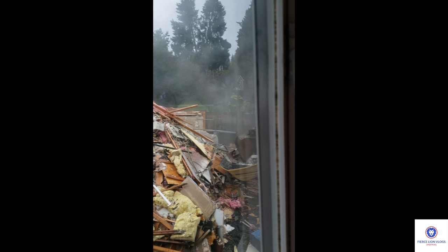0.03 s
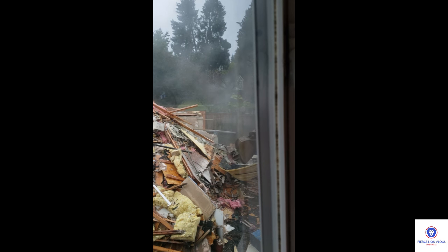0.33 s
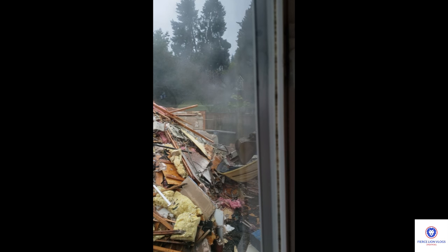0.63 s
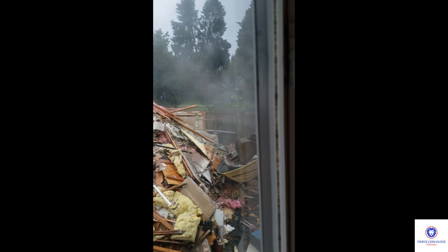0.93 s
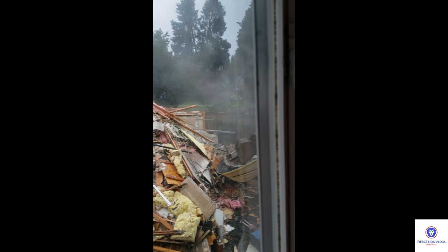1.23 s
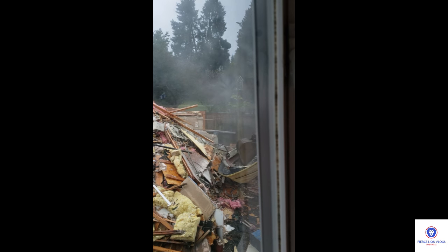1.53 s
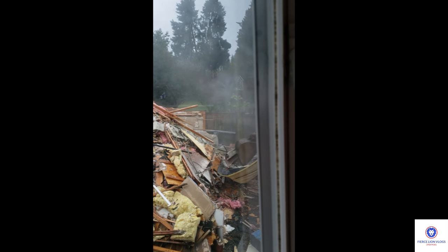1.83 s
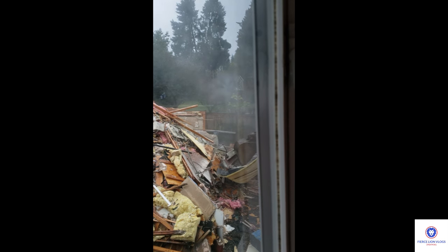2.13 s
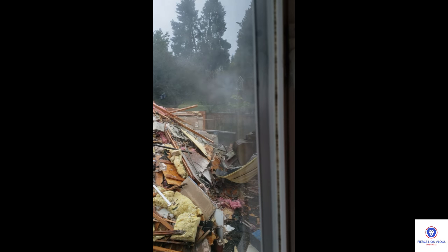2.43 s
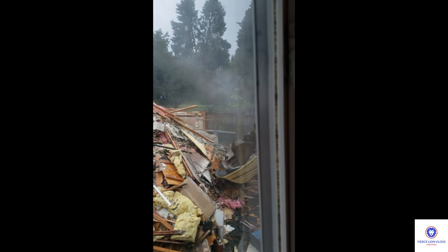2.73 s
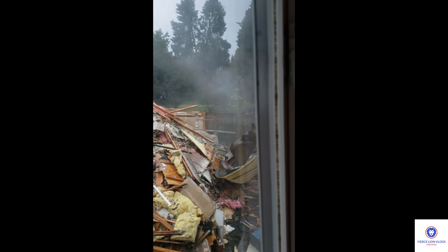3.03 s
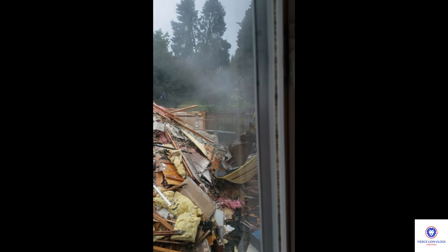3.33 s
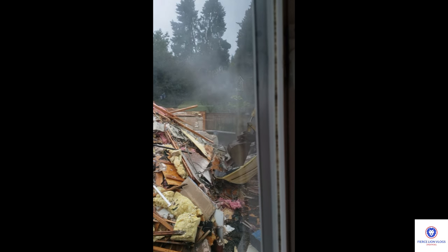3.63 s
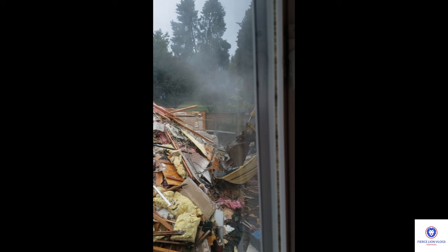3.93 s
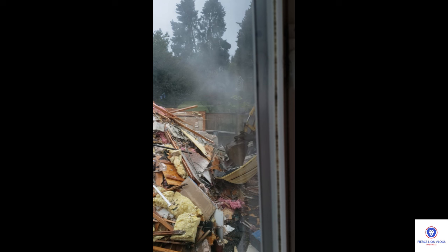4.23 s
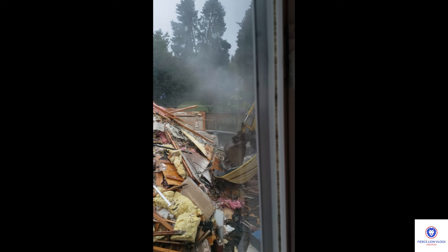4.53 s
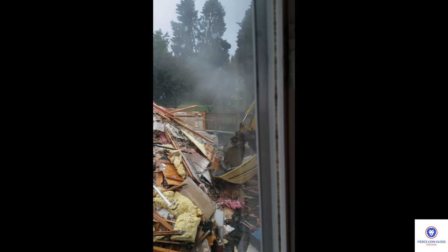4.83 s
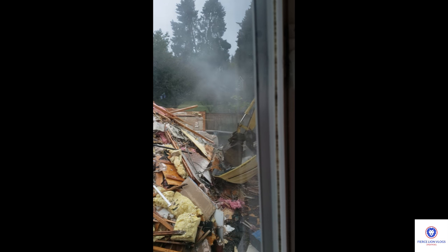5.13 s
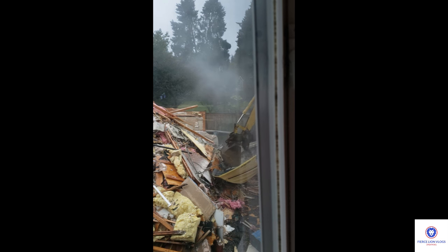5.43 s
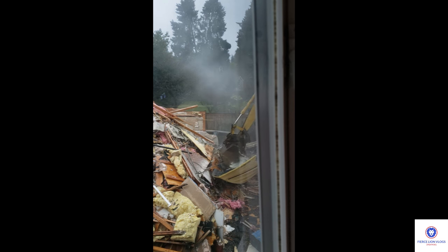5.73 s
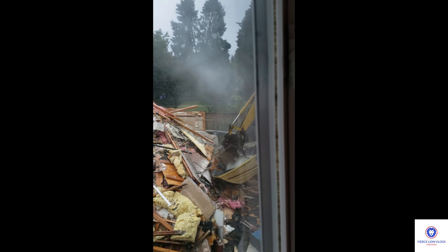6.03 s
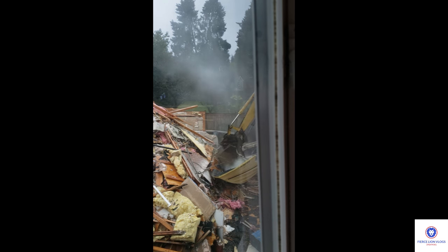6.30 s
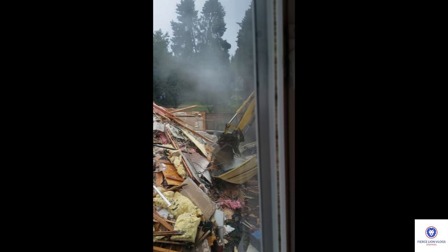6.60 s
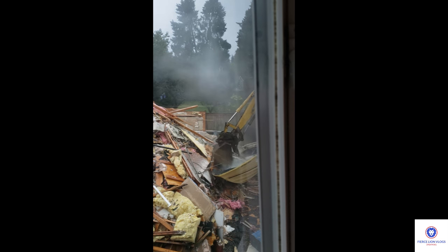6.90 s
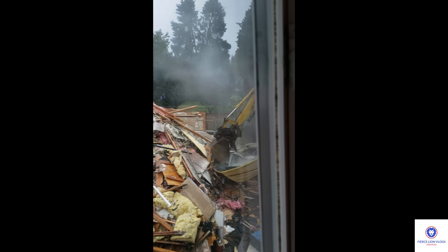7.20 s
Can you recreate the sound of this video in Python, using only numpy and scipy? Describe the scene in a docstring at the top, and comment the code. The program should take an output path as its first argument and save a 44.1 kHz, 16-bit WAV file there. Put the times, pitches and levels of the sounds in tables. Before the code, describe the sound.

An excavator demolishes a timber house, heard in stereo from indoors behind a closed window. The bass booms in the room, and the snaps come through the glass thin and bright. A diesel engine drones throughout under a faint, fine rustle. At first the bucket only nibbles, with small cracks. At about 1.3 seconds the heap heaves with a swelling rumble, and heavy pieces boom down until 2 seconds, when the hydraulic pump whines and wood keeps snapping. From 3 seconds boards splinter and crunch, planks knock and beams groan briefly among more deep thuds. The crushing is hardest around 4.6 seconds and continues in bursts until nearly 6 seconds. After that come lighter cracks, a short scrape of the bucket over rubble at about 6.3 seconds and a last thud near 6.7 seconds, with a few more snaps over the engine until just past 7 seconds.

```python
"""An excavator wrecks a timber house; a stereo microphone stands indoors, behind a closed window.
First the diesel drones under a faint rustle and the bucket nibbles. At 1.3 s the heap heaves and heavy
pieces boom down; by 2 s the pump whines. From 3 s boards splinter, planks knock and beams groan, hardest
around 4.6 s. After 6 s come lighter cracks, a scrape over rubble and a last thud. All along the pane
passes the bass and a band near 5.7 kHz, where it bends in step with the air, and the room booms."""
import sys
import numpy as np
from scipy import signal
from scipy.fft import rfft, irfft, next_fast_len
from scipy.io import wavfile
from scipy.ndimage import uniform_filter1d

SR = 44100
rng = np.random.default_rng(int(sys.argv[2]) if len(sys.argv) > 2 else 0)


def file_out(sig):
    """Save sig as 16-bit WAV at sys.argv[1]."""
    # one column per channel
    cols = np.atleast_2d(sig).T
    # limit, then scale
    lim = np.clip(cols, -1, 1)
    pcm = np.round(lim * 32767).astype(np.int16)
    wavfile.write(sys.argv[1], SR, pcm)


N = 320166
T = np.arange(N) / SR
FFT_SIZE = next_fast_len(N + SR // 2, True)
FREQ = np.maximum(np.arange(FFT_SIZE // 2 + 1) * SR / FFT_SIZE, 1)
PANE_HZ = 5740


# Boards, splinters and tiny shards, as they sound from inside the window: frequency_hz, gain_db
BOARD_COLOUR = [(100, 1.5), (250, 5.5), (500, 3.5), (800, 3.5), (1050, 1), (1600, -3), (2150, 2),
                (3200, -7), (4500, -3), (7000, -18), (8100, -30), (9900, -24), (12500, -34.5),
                (15500, -36.5)]
SPLINTER_COLOUR = [(500, -22.5), (2000, -21), (3300, -27), (4200, -13), (5100, -3), (5850, -1), (6400, -10),
                   (7200, -19), (8100, -26.5), (9900, -29), (11000, -44.5), (15500, -36.5)]
SHARD_COLOUR = [(3000, -34.5), (7000, -5), (8300, -3), (9700, 0), (11000, -8.5), (12800, -12), (15500, -5)]
def crushing():
    """Boards give way in dull cracks, fibres tear in bright ones; chips fly and hard bites spray shards."""
    boards_gain, splinters_gain = bucket_bites()
    boards = unit(colour(crackle(rate_hz=800, spread_db=3.5, tint_db=4.0), BOARD_COLOUR))
    fibres = unit(colour(crackle(rate_hz=800, spread_db=0.5, tint_db=2.5), SPLINTER_COLOUR))
    splinters = fibres + undb(-6.5) * chips(rate_hz=55, spread_db=-0.5, detune=0.035, decay_s=0.0041)
    shards = unit(colour(crackle(rate_hz=330, spread_db=4.0, tint_db=-2.0), SHARD_COLOUR))
    shards_gain = undb(-64) * (splinters_gain / undb(-48.5)) ** 0.83  # grows slower than the splinters
    hardness = 1 / (1 + (undb(-53) / splinters_gain) ** 2)  # near 0 for a gentle bite
    bright = splinters * splinters_gain + shards * shards_gain * hardness
    jerks = undb(walk(35))
    return jerks * boards * boards_gain, jerks * bright


# The bucket bites into the wreck outside: start_s, length_s, boards_db, splinters_db
BUCKET_BITES = [(0.039, 0.081, -73.5, -81), (0.323, 0.14, -72.5, -69), (0.455, 0.087, -61, -70),
                (0.612, 0.17, -70.5, -63.5), (0.958, 0.078, -59, -63.5), (1.175, 0.075, -84, -63.5),
                (1.278, 0.064, -58.5, -55), (1.521, 0.088, -54.5, -50), (1.632, 0.1, -58.5, -68),
                (2.065, .03, -63, -54.5), (2.187, 0.097, -61.5, -69), (2.316, 0.45, -63, -58),
                (2.92, 0.12, -62.5, -56), (3.015, 0.13, -51.5, -49), (3.119, 0.067, -45.5, -44.5),
                (3.394, 0.19, -54.5, -52.5), (3.67, 0.12, -47.5, -47.5), (3.995, 0.21, -53, -54.5),
                (4.251, 0.25, -46.5, -50.5), (4.45, 0.027, -40, -41), (4.511, 0.045, -34, -40),
                (4.62, 0.057, -40.5, -42), (4.977, 0.11, -49, -51), (5.038, 0.11, -47.5, -49),
                (5.168, .16, -47.5, -54), (5.364, 0.042, -41.5, -43.5), (5.444, 0.082, -47.5, -48.5),
                (5.803, 0.036, -49, -48.5), (6.349, 0.11, -61.5, -53), (6.45, 0.072, -52.5, -70),
                (6.555, 0.13, -62.5, -55.5), (6.7, 0.16, -73, -60)]
# Debris trickles down the heap: time_s, relative_db
DEBRIS_TRICKLE = [(0.0, -70), (0.69, -69), (1.09, -78), (1.43, -58), (1.8, -56), (2.0, -64.5), (2.5, -54.5),
                  (2.88, -62), (4.12, -55.5), (4.55, -47.5), (4.79, -60), (5.28, -49), (6.05, -61.5),
                  (6.3, -64), (6.55, -57), (6.87, -67), (7.26, -54.5)]
def bucket_bites(attack_s=0.0062, build_db=2):
    """Gains of boards and splinters: each bite crushes, then loose pieces settle, over a trickle."""
    trickle_db, = curves(DEBRIS_TRICKLE)
    power = undb([trickle_db - 11, trickle_db - 2.5]) ** 2  # boards, splinters
    for start_s, length_s, boards_db, splinters_db in BUCKET_BITES:
        progress = np.clip((T - start_s) / length_s, 0, 1)
        crush = undb(build_db * (progress - 0.45)) * push(start_s, length_s, attack_s, release_s=0.036)
        settle = undb(-19) * push(start_s, length_s, attack_s, release_s=0.31)
        power += np.outer(undb([boards_db, splinters_db]) ** 2, crush ** 2 + settle ** 2)
    return np.sqrt(power)


def chips(rate_hz, spread_db, detune, decay_s):
    """Small chips tick at random, each ringing briefly at its own pitch within the band of the pane."""
    out = np.zeros(N)
    t = T[:SR // 30]
    envelope = t * np.exp(-2 * t / decay_s)
    at = np.flatnonzero(rng.random(N) < rate_hz / SR)
    for start_s, (size, pitch) in zip(T[at], rng.standard_normal((N, 2))[at]):
        ring = np.sin(2 * np.pi * PANE_HZ * (1 + detune * pitch) * t)
        add(out, start_s, undb(spread_db * size) * envelope * ring)
    return unit(out)


# Wood snaps out at the bucket: start_s, relative_db, board_share_db, pitch_hz
WOOD_SNAPS = [(0.4758, -47.5, -9, 4920), (0.551, -46.5, -24, 5600), (1.2926, -40, -17, 4940),
              (1.312, -45, -21, 5730), (1.5527, -38, -8, 5750), (1.818, -47, -16, 5750),
              (1.866, -40, -9, 5750), (1.9154, -39.5, -33, 5670), (2.039, -46, -24, 5850),
              (2.0773, -37, -20, 5900), (2.186, -31, -29, 5780), (2.2841, -45, -22, 5830),
              (2.35, -38.5, -22, 5770), (2.432, -41, -22, 6000), (2.5196, -36.5, -14, 5760),
              (2.622, -52, -20, 5890), (2.7171, -39.5, -16, 5560), (2.968, -47, -18, 5580),
              (3.0198, -30.5, -4.5, 5820), (3.065, -34.5, -7, 5800), (3.145, -25.5, -4, 5730),
              (3.241, -38.5, -19, 5620), (3.408, -37, 2, 5700), (3.435, -40, -20, 5600),
              (3.545, -36, -14, 5800), (3.674, -40, -6, 5570), (3.691, -37, -14, 5640),
              (3.767, -32, -19, 5770), (4.278, -36, -3, 5200), (4.358, -37, -14, 5740),
              (4.4085, -29, -13, 5550), (4.466, -25.5, -8, 5060), (4.531, -20, -25, 5500),
              (4.5515, -21, -12, 5540), (4.59, -35.5, -14, 5600), (4.651, -29.5, -16, 5740),
              (4.6761, -19.5, -10, 5050), (5.0564, -30.5, -11, 5470), (5.109, -39, -14, 5420),
              (5.222, -35.5, -3, 5500), (5.3158, -34, -8, 5870), (5.3858, -26.5, -17, 5780),
              (5.474, -38, -9, 5030), (5.8265, -28.5, -17, 5760), (6.036, -45.5, -32, 6000),
              (6.097, -39.5, -27, 5670), (6.1883, -40.5, -11, 6060), (6.202, -41, -28, 5820),
              (6.2678, -42.5, -25, 5930), (6.317, -41, -25, 6030), (6.3405, -40, -17, 5900),
              (6.396, -39.5, -23, 5900), (6.4365, -35.5, -17, 5780), (6.472, -31, -20, 5960),
              (6.5023, -30.5, -18, 5700), (6.567, -37, -22, 5830), (6.6224, -36, -20, 5730),
              (7.008, -41, -23, 5780), (7.038, -41, -26, 5750), (7.229, -34, -33, 5870)]
def snaps(rise_s, tear_s, crack, snap_db, body_db, ring_gain, ring_width_hz):
    """Each break is one sharp crack and a run of tearing fibres that set the pane ringing, at a pitch that
    shifts with the angle the sound strikes it."""
    out = np.zeros(N)
    t = T[:SR // 10]
    for start_s, relative_db, board_share_db, pitch_hz in WOOD_SNAPS:
        noise, roughness = rng.standard_normal((2, len(t)))
        tear = noise * undb(3.5 * roughness) * (1 - np.exp(-t / rise_s)) * np.exp(-t / tear_s)
        tear = tear / np.linalg.norm(tear) + crack * (t == 0)
        fibres = colour(tear, SPLINTER_COLOUR, stretch=np.sqrt(pitch_hz / PANE_HZ))
        ringing = fibres + ring_gain * band(fibres, pitch_hz, ring_width_hz)
        piece = undb(snap_db) * ringing / np.linalg.norm(ringing)
        board = undb(board_share_db + body_db) * colour(tear, BOARD_COLOUR)
        add(out, start_s, undb(relative_db) * (piece + board))
    return out


# Heavy pieces hit the ground outside: start_s, relative_db, pitch_hz
HEAVY_LANDINGS = [(1.534, -13.5, 136), (1.577, -11.5, 138.4), (1.585, -13.5, 71), (1.621, -16.5, 119),
                  (1.665, -24, 75), (1.734, -15, 142.3), (1.778, -19, 149), (1.932, -17, 141.6),
                  (3.085, -20.5, 72), (3.149, -15, 198.5), (3.191, -18.5, 153), (3.215, -25, 71),
                  (3.549, -25, 129), (4.49, -22.5, 182), (4.538, -19.5, 213), (4.578, -20.5, 142),
                  (4.642, -20.5, 117), (4.678, -15.5, 190), (4.688, -12, 79), (4.725, -17, 75),
                  (5.096, -14.5, 161.4), (5.191, -19, 160), (5.291, -22, 76.5), (5.386, -17, 168),
                  (5.524, -22.5, 150), (5.842, -22, 117), (6.674, -20, 169)]
def thuds(rise_s, decay_s, rattle, gain_db):
    """A heavy piece lands: a short boom of beams and ground, with loose rubble jolted along."""
    booms, jolts = np.zeros((2, N))
    t = T[:SR // 3]
    for start_s, relative_db, pitch_hz in HEAVY_LANDINGS:
        swell = undb(relative_db + gain_db) * (1 - np.exp(-t / rise_s)) * np.exp(-t / decay_s)
        add(booms, start_s, swell * np.sin(2 * np.pi * pitch_hz * t))
        add(jolts, start_s, swell)
    rubble = unit(colour(rng.standard_normal(N), RUMBLE_COLOUR))
    return booms + rattle * jolts * rubble


# Planks and sheets knock together in the wreck: start_s, relative_db, pitch_hz
PLANK_KNOCKS = [(0.962, -60, 3500), (1.291, -49, 3630), (1.57, -49, 830), (2.082, -48.5, 580),
                (3.058, -44.5, 784), (3.142, -36.5, 1630), (3.146, -41, 570), (3.197, -40, 586),
                (3.402, -52, 810), (4.275, -45, 810), (4.467, -34, 2170), (4.545, -42, 850),
                (4.551, -31.5, 2900), (4.672, -44, 820), (4.678, -35.5, 3600), (4.68, -37, 2620),
                (5.827, -41, 4320), (6.346, -56, 830)]
def knocks(rise_s=0.0014, decay_s=0.012, gain_db=2.5):
    """A knocked plank or sheet gives a brief, rough ring at its own pitch."""
    out = np.zeros(N)
    t = T[:SR // 10]
    for start_s, relative_db, pitch_hz in PLANK_KNOCKS:
        impact = rng.standard_normal(len(t)) * np.exp(-t / decay_s)
        ring = band(band(impact, pitch_hz, 0.32 * pitch_hz), pitch_hz, pitch_hz / 2)
        ring *= 1 - np.exp(-t / rise_s)
        add(out, start_s, undb(relative_db + gain_db) * ring / np.abs(ring).max())
    return out


# Beams groan under load in the heap: start_s, length_s, level_db, pitch_hz
BEAM_GROANS = [(1.725, 0.036, -48, 402), (3.028, 0.03, -48.5, 444), (3.152, 0.057, -48.5, 475),
               (3.757, 0.065, -50, 388), (4.282, 0.064, -45, 345), (4.344, 0.12, -47.5, 438),
               (4.515, 0.23, -51.5, 445), (5.253, 0.19, -47.5, 340), (5.38, 0.056, -42, 358),
               (5.512, 0.039, -43.5, 364), (7.016, 0.13, -51.5, 335)]
def groans(width_hz=200):
    """Loaded beams stick and slip against each other; each rings at its own low note."""
    slips = crackle(rate_hz=300, spread_db=3.0, tint_db=0.5)
    out = np.zeros(N)
    for start_s, length_s, level_db, pitch_hz in BEAM_GROANS:
        ring = unit(band(band(slips, pitch_hz, width_hz), pitch_hz, width_hz))
        out += undb(level_db) * ring * push(start_s, length_s, attack_s=0.0082, release_s=0.028)
    return out


# The bucket drags over the rubble: start_s, length_s, level_db
BUCKET_SCRAPES = [(0.026, 0.045, -65), (5.464, 0.081, -51), (6.343, 0.17, -50.5)]
# Its steel ring, heard through the glass: pitch_hz, width_hz, relative_db
BUCKET_RING = [(594, 54, -7), (825, 78, -1.5), (5750, 110, -10)]
def scrape(fade_db_per_s=22):
    """Steel catches and slides to a halt; stick and slip ring the bucket at two low notes and a high one."""
    slips = crackle(rate_hz=780, spread_db=0.1, tint_db=-0.5)
    ring, drag = np.zeros((2, N))
    for pitch_hz, width_hz, relative_db in BUCKET_RING:
        ring += undb(relative_db) * unit(band(band(slips, pitch_hz, width_hz), pitch_hz, 3 * width_hz))
    for start_s, length_s, level_db in BUCKET_SCRAPES:
        fade_db = fade_db_per_s * np.maximum(T - start_s, 0)
        drag += undb(level_db - fade_db) * push(start_s, length_s, attack_s=0.0044, release_s=0.07)
    return drag * unit(ring)


# The whole heap is pushed and gives way: start_s, length_s, end_level_db
HEAP_HEAVES = [(1.32, 0.53, -37.5), (2.979, 0.31, -36.5), (3.508, 0.066, -35), (3.73, 0.097, -37.5),
               (4.266, 0.44, -29), (5.058, 0.25, -36.5), (5.266, 0.287, -33), (5.829, 0.053, -37)]
# The low roar on the microphone's side of the wall: frequency_hz, gain_db
RUMBLE_COLOUR = [(20, -33), (35, -13), (50, -7.5), (80, -2), (115, -2), (200, -0.5), (235, -5.5),
                 (270, -14), (400, -20.5), (560, -25.5), (850, -32.5), (1100, -36.5), (3000, -72)]
def rumble(steady_db=-43, build_db_per_s=24):
    """The machine shakes the wall: a throbbing roar builds as the heap is pushed and drops as it gives."""
    power = undb(steady_db) ** 2
    for start_s, length_s, end_level_db in HEAP_HEAVES:
        build_db = build_db_per_s * np.minimum(T - start_s - length_s, 0)
        envelope = push(start_s, length_s, attack_s=0.0038, release_s=0.063)
        power += (undb(end_level_db + build_db) * envelope) ** 2
    roar = unit(colour(rng.standard_normal(N), RUMBLE_COLOUR))
    throb = undb(2.9 * walk(14))
    return roar * np.sqrt(power) * throb


# The diesel at work beyond the window: time_s, shaft_hz, whine_db
ENGINE_DRIVE = [(0, 40.12, -63), (1.4, 39.94, -59), (2.1, 40.35, -46.5), (2.8, 40.24, -53),
                (3.3, 39.8, -51.5), (4.2, 40.34, -45), (5.0, 40.47, -47.5), (5.8, 40.09, -44.5),
                (6.4, 40.15, -65), (7.26, 40, -50.5)]
# Partials of the engine block and of the pump: shaft_multiple, relative_db
BLOCK_PARTIALS = [(3, 1), (6, -22.5), (10, -19.5), (20, -37)]
PUMP_PARTIALS = [(8, -9), (16, -30), (24, -29)]
def engine(exhaust_db=-56, hum_db=-48.5, fan_db=-66, fan_hz=348):
    """Four cylinders fire twice a turn; the block hums, the hydraulic pump whines and the fan drones."""
    shaft_hz, whine_db = curves(ENGINE_DRIVE)
    turns = np.cumsum(shaft_hz * (1 + 0.003 * walk(9))) / SR
    firings = np.diff(np.floor(2 * turns), prepend=0) * undb(10.5 * rng.standard_normal(N))
    exhaust = unit(band(band(firings, hz=125, width_hz=92), hz=125, width_hz=92))
    fan_cycles = np.cumsum(fan_hz * (1 + 0.00642 * walk(12))) / SR
    fan = tones(fan_cycles, [(1, 0.0033)], waver_db=3.5)
    hum = tones(turns, BLOCK_PARTIALS, waver_db=3.0)
    whine = tones(turns, PUMP_PARTIALS, waver_db=4.0)
    return undb(exhaust_db) * exhaust + undb(hum_db) * hum + undb(whine_db) * whine + undb(fan_db) * fan


# A faint rustle beyond the window: time_s, level_db
RUSTLE_LEVELS = [(0, -68.5), (0.29, -73.5), (0.36, -66), (0.8, -66), (1.12, -70), (1.4, -67.5),
                 (7.26, -65.5)]
# The rustle as it sounds indoors: frequency_hz, gain_db
RUSTLE_COLOUR = [(500, -27), (2000, -24.5), (3300, -26.5), (4200, -18), (5100, 0.5), (5600, 0.5),
                 (6400, -10), (7200, -29), (8300, -41), (15500, -42.5)]
def rustle():
    """A faint, fine rustle of dense tiny ticks, heard through the glass."""
    level_db, = curves(RUSTLE_LEVELS)
    gain = undb(level_db + 1.1 * walk(4.3))
    ticks = crackle(rate_hz=2200, spread_db=5.5, tint_db=3.5)
    return gain * unit(colour(ticks, RUSTLE_COLOUR))


# Low room resonances, two higher rings of the boards, and a flat last row: pitch_hz, width_hz, gain_db
RESONANCES = [(74.8, 9.7, 9), (129, 10.9, 9.5), (170.6, 17, 3.5), (215.8, 10.2, 4.5), (241.3, 6.5, 8.5),
              (317.1, 11.7, 8.5), (348.6, 11, 13.5), (392.7, 9.9, 9), (450.8, 12, 10.5), (476.5, 10.2, 10),
              (592, 17.6, 9), (812, 130, 6.5), (875, 20, 4), (1610, 75, 6), (2086, 51, 3.5), (5780, 140, 0)]
def room(sources):
    """Each source scatters along its own paths; the same resonances colour everything heard indoors."""
    response = 1 + sum((undb(db) - 1) * resonance(hz, width_hz) for hz, width_hz, db in RESONANCES)
    return through(sum(scatter(source) for source in sources), response)


def scatter(x, t60_s=0.32, direct=0.23, early_s=0.0039, early_gain=8.9, diffuse_hz=540, shift_rad_s=3.98):
    """Bass reaches both microphone ports alike, treble in short tails that shift as the source moves."""
    t = T[:2 ** 14]
    decay = np.exp(-np.log(1000) * t / t60_s) + early_gain * np.exp(-t / early_s)
    echoes = rng.standard_normal((2, 2, len(t))) * decay / np.linalg.norm(decay)  # path set, port, time
    echoes[0, 1, 0] += direct  # only the right port sees the window
    paths = rfft(echoes)
    paths /= np.sqrt(uniform_filter1d(np.abs(paths) ** 2, size=70))  # many paths favour no broad band
    hz = np.linspace(0, SR / 2, paths.shape[-1])
    shared = 0.985 / (1 + (hz / diffuse_hz) ** 4)

    def hear(response, lead=256):
        impulse = np.roll(irfft(response), lead, axis=1)
        return signal.oaconvolve(x[None], impulse, axes=1)[:, lead:lead + N]

    bass = hear(np.sqrt(shared)[None])
    here, there = (hear(np.sqrt(1 - shared) * path_set) for path_set in paths)
    return bass + np.cos(shift_rad_s * T) * here + np.sin(shift_rad_s * T) * there


def crackle(rate_hz, spread_db, tint_db):
    """Random clicks, a few large and many small, each with its own weight in every octave."""
    at = np.flatnonzero(rng.random(N) < rate_hz / SR)
    size_db = spread_db * np.minimum(rng.exponential(size=N)[at], 4)
    out = np.zeros(N)
    for hz in 180 * 2 ** np.arange(7):
        polarity, tint = rng.standard_normal((len(at), 2)).T
        clicks = np.bincount(at, np.sign(polarity) * undb(size_db + tint_db * tint), N)
        out += band(clicks, hz, hz / 2)
    return unit(out)


def tones(cycles, partials, waver_db):
    """Sines on multiples of a rotation, each wavering in level."""
    return sum(undb(db + waver_db * walk(7.6)) * np.sin(2 * np.pi * k * cycles) for k, db in partials)


def push(start_s, length_s, attack_s, release_s):
    """Envelope of one push of the bucket: attack, hold, release."""
    out = np.zeros(N)
    t = T[:int(1.5 * SR)]
    add(out, start_s, (1 - np.exp(-t / attack_s)) * np.exp(-np.maximum(t - length_s, 0) / release_s))
    return out


def colour(x, points, stretch=1):
    """Give a sound the outline of (Hz, dB) points, stretched in frequency, with a causal filter."""
    hz, db = np.transpose(points)
    bins = np.linspace(1, SR / 2, 2049)
    gain = undb(np.interp(np.log(bins), np.log(hz * stretch), db))
    cepstrum = irfft(np.log(gain))
    cepstrum[1:len(bins) - 1] *= 2  # fold onto positive time: minimum phase
    cepstrum[len(bins):] = 0
    return signal.oaconvolve(x, irfft(np.exp(rfft(cepstrum))))[:len(x)]


def band(x, hz, width_hz):
    """Band-pass, gain 1 at the centre."""
    return signal.lfilter(*signal.iirpeak(hz, hz / width_hz, fs=SR), x + 1e-18)


def resonance(hz, width_hz):
    """Response of one resonance, gain 1 at its centre."""
    return 1 / (1 + 1j * (FREQ / hz - hz / FREQ) * hz / width_hz)


def through(x, response):
    """Pass a sound through a frequency response."""
    return irfft(rfft(x, FFT_SIZE) * response, FFT_SIZE)[..., :N]


def walk(rate_hz):
    """Random levels held 1 / rate_hz seconds and slewed; spread near 1."""
    hold = int(SR / rate_hz)
    steps = np.repeat(rng.standard_normal(N // hold + 1), hold)
    return 1.2 * uniform_filter1d(steps, hold)[:N]


def curves(table):
    """Each column of a table, joined by straight lines in time."""
    time_s, *columns = np.transpose(table)
    return [np.interp(T, time_s, column) for column in columns]


def add(track, start_s, sound):
    """Mix a sound into a track."""
    i = max(int(start_s * SR), 0)
    track[i:i + len(sound)] += sound[:max(N - i, 0)]


def undb(db):
    """Decibels to gain."""
    return 10 ** (np.asarray(db) / 20)


def unit(x):
    """Scale to rms 1."""
    return x / np.sqrt(np.mean(x ** 2))


def scene():
    """Everything outside reaches the microphone through the pane and the room."""
    boards, splinters = crushing()
    breaks = snaps(rise_s=0.002, tear_s=0.008, crack=0.42, snap_db=18.0, body_db=14.0,
                   ring_gain=1.9, ring_width_hz=145)
    falls = thuds(rise_s=0.0029, decay_s=0.019, rattle=0.2, gain_db=-5.5)
    background = engine() + rumble() + rustle()
    grinding = boards + scrape() + groans()
    impacts = breaks + knocks() + falls
    return room([background, grinding, splinters, impacts])


# The microphone's left port against its right: frequency_hz, gain_db
PORT_BALANCE = [(60, 0), (200, -4), (380, 0.5), (600, -3.5), (850, -0.5), (1200, -10), (2400, -5.5),
                (4400, -11.5), (5800, -16), (8100, -2), (15000, -2.5)]
def record(dry, hiss_db=-85.5, top_hz=15500):
    """The left port faces away from the window and is duller; faint bright hiss, and the top is cut."""
    hz, db = np.transpose(PORT_BALANCE)
    left = undb(np.interp(np.log(FREQ), np.log(hz), db))
    ports = through(dry, np.array([left, np.ones_like(left)]) * 2 / (1 + left))
    hiss = undb(hiss_db) * np.diff(rng.standard_normal((2, N + 2)), 2)
    lowpass = signal.ellip(10, 0.2, 80, top_hz, fs=SR, output="sos")
    return signal.sosfilt(lowpass, ports + hiss)


dry = scene()
out = record(dry)
file_out(out)
```